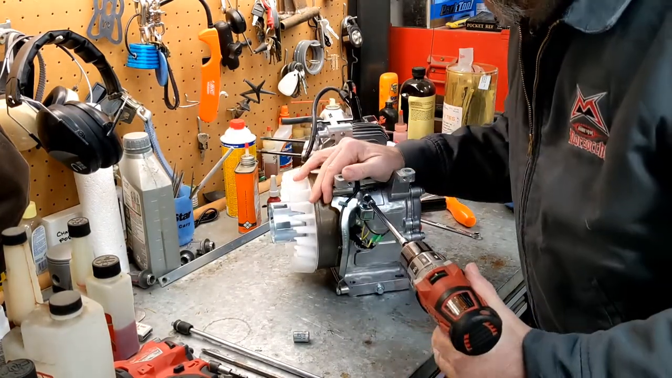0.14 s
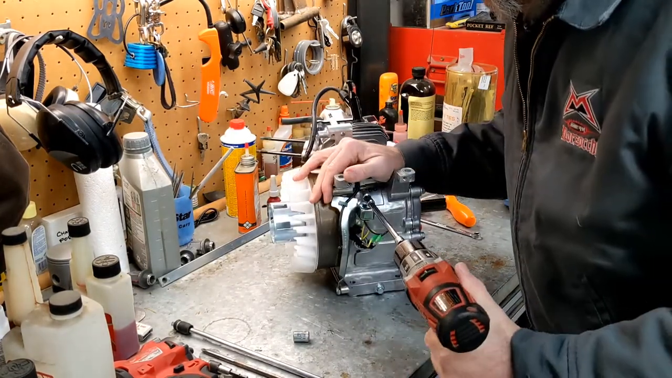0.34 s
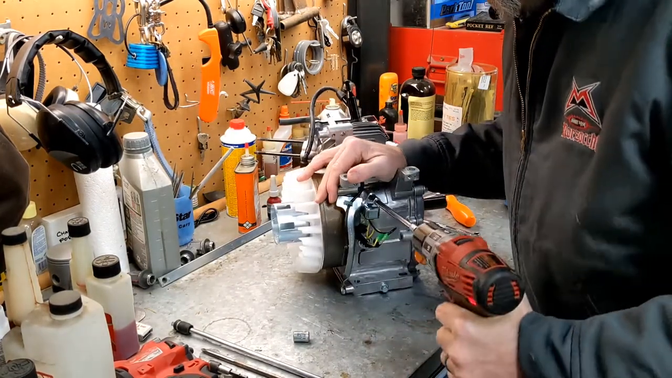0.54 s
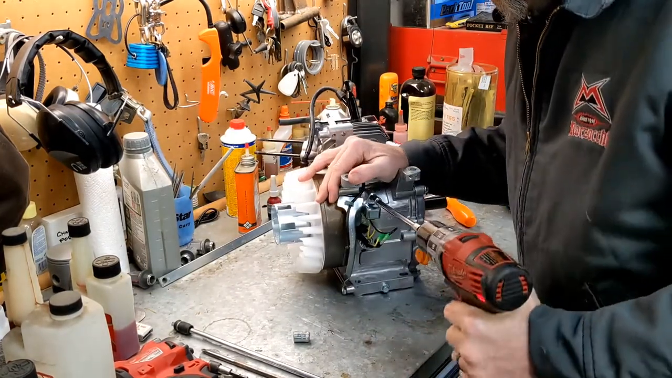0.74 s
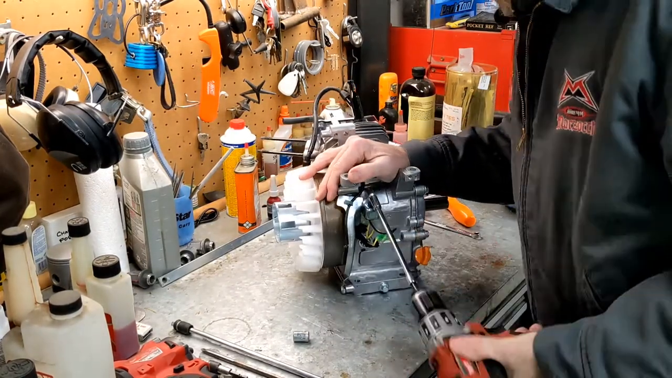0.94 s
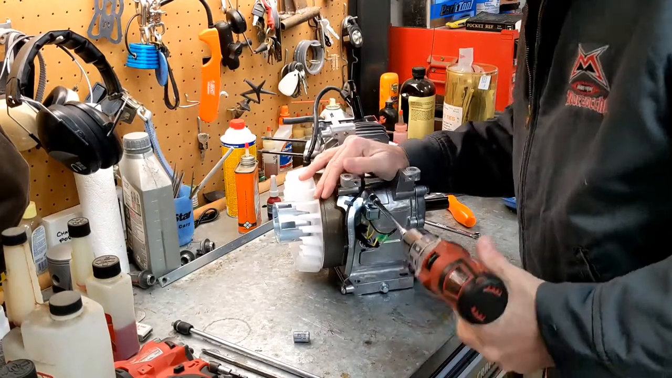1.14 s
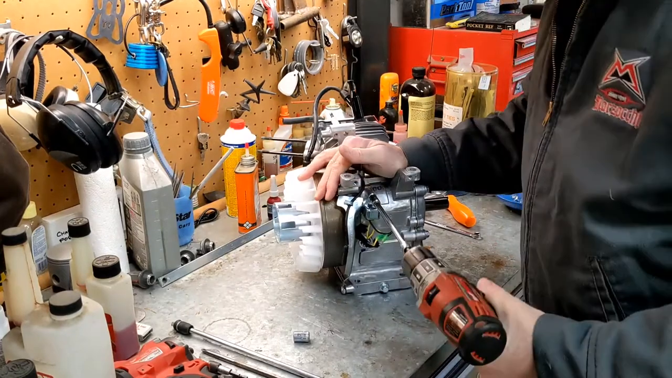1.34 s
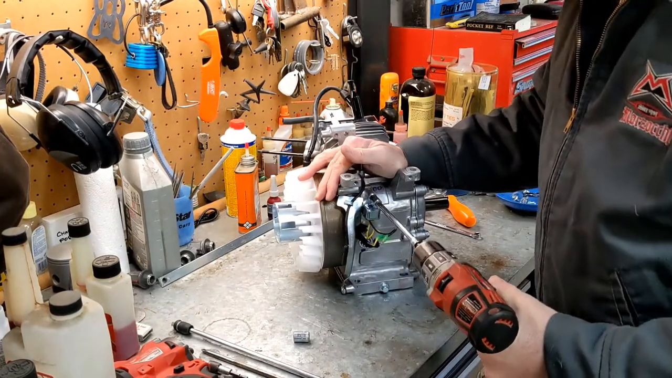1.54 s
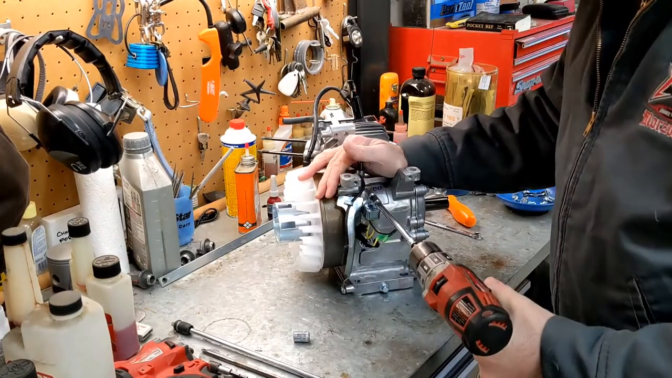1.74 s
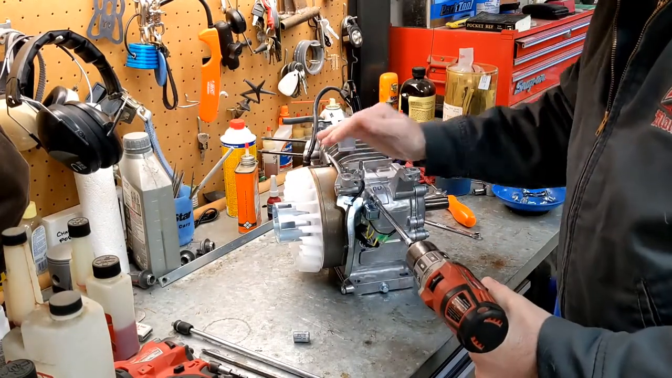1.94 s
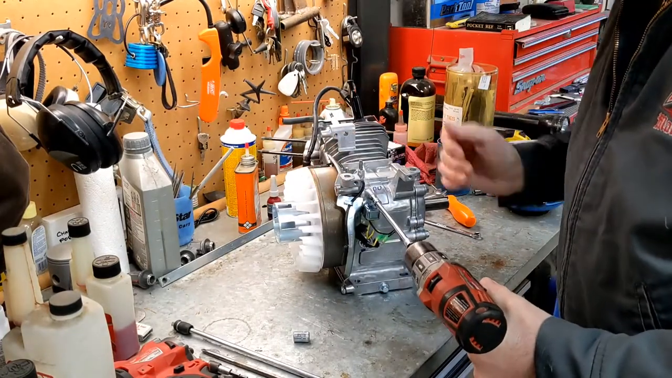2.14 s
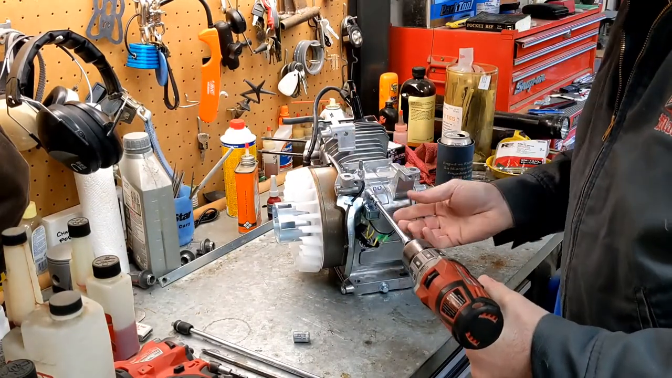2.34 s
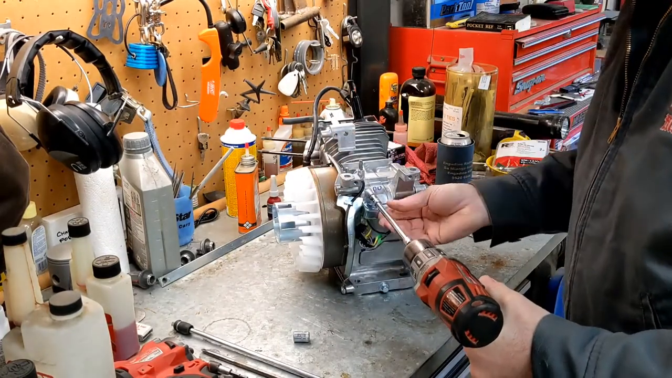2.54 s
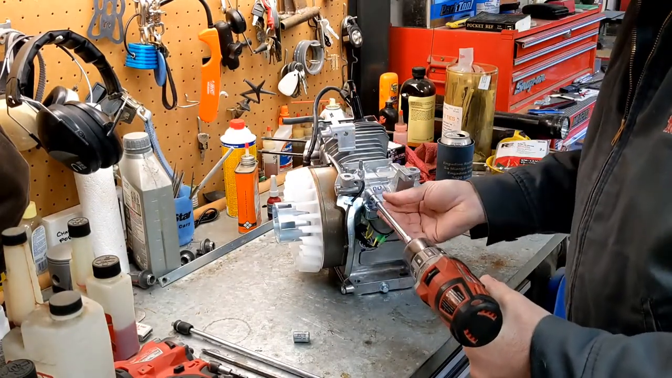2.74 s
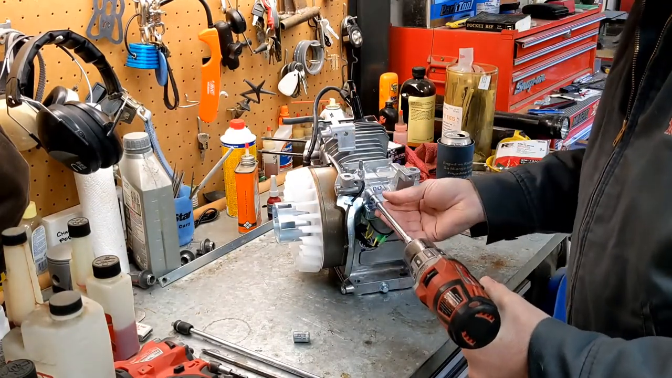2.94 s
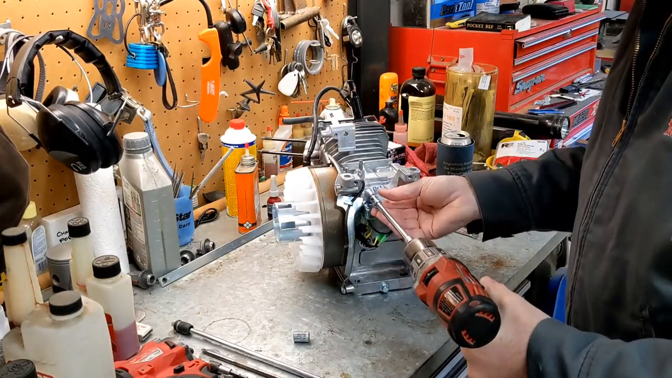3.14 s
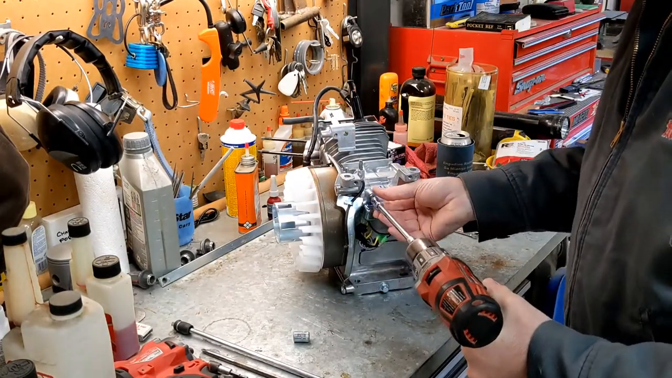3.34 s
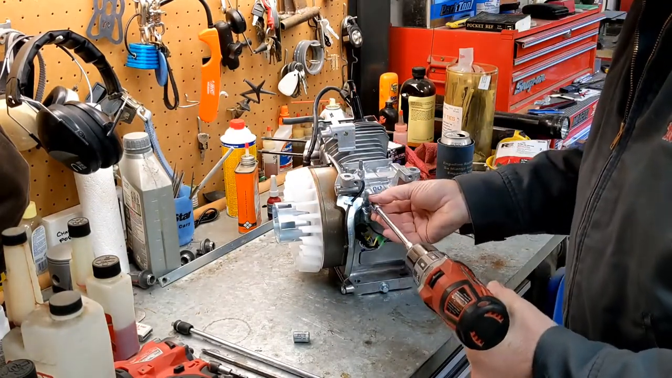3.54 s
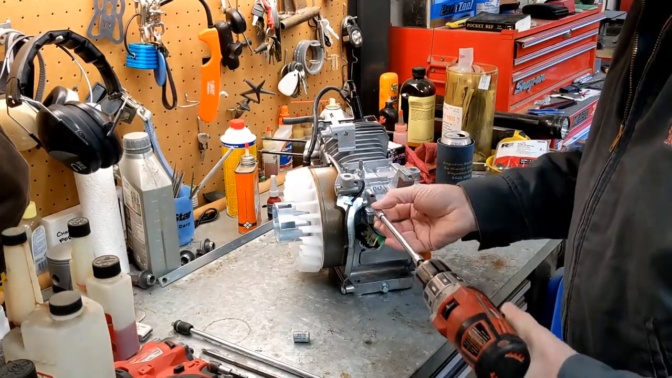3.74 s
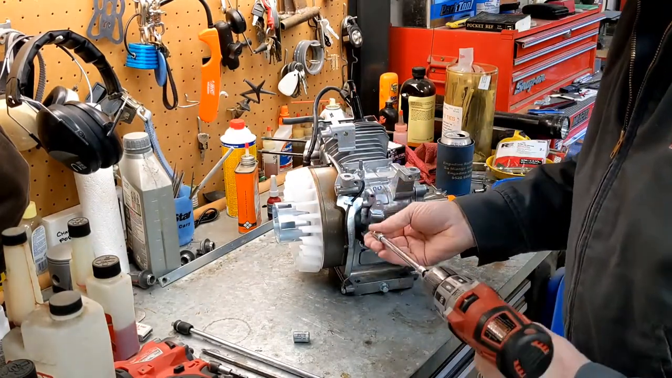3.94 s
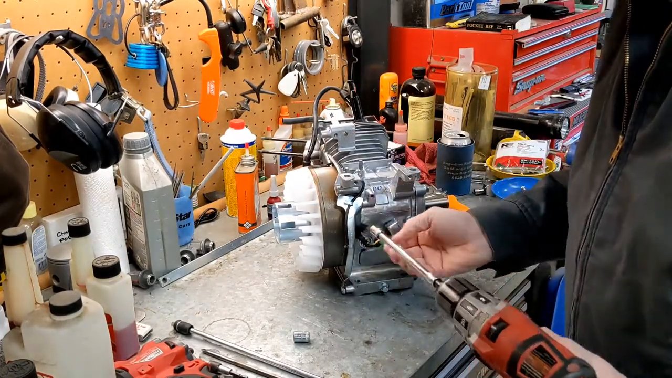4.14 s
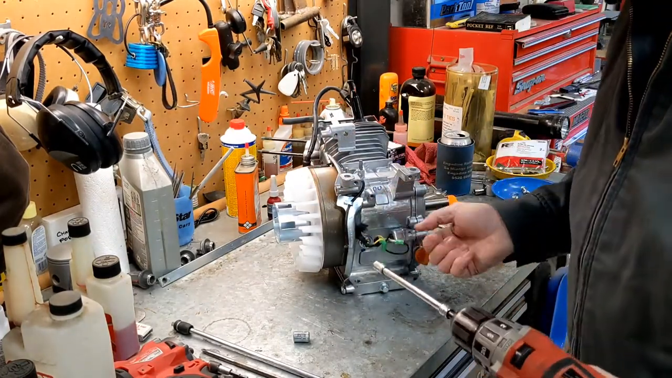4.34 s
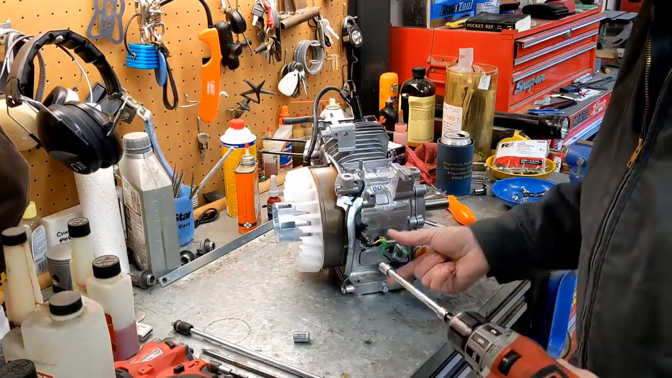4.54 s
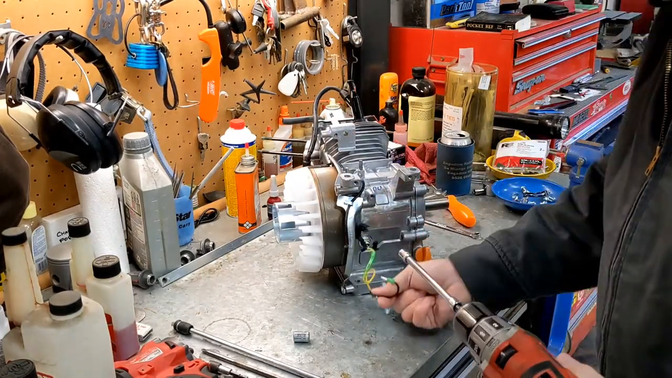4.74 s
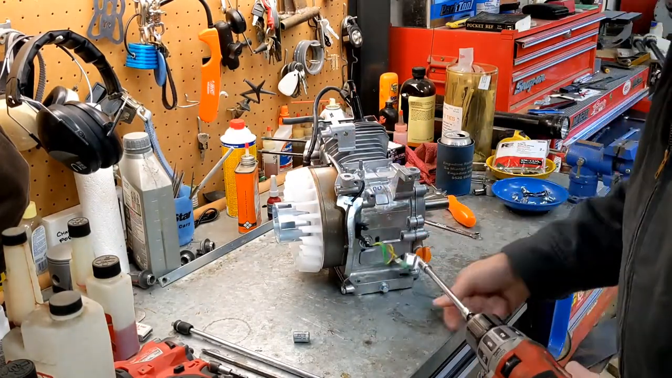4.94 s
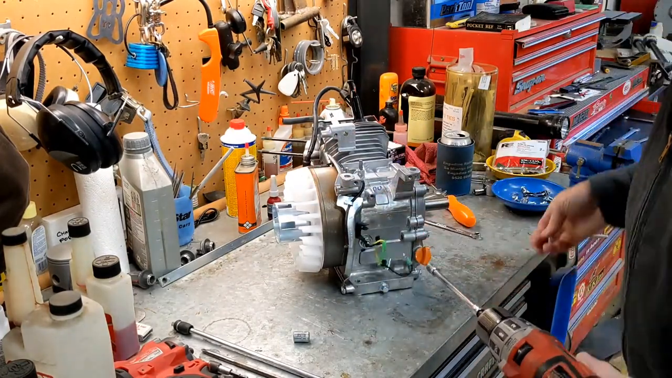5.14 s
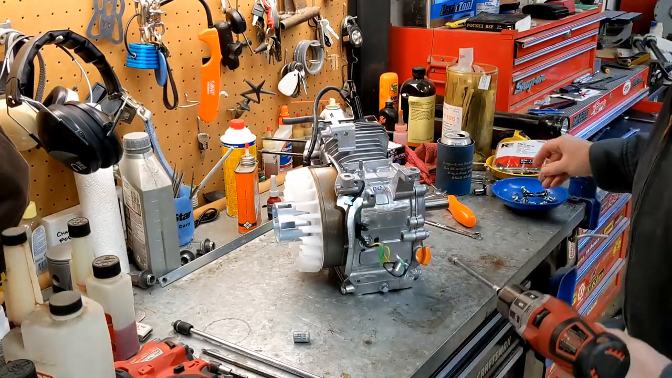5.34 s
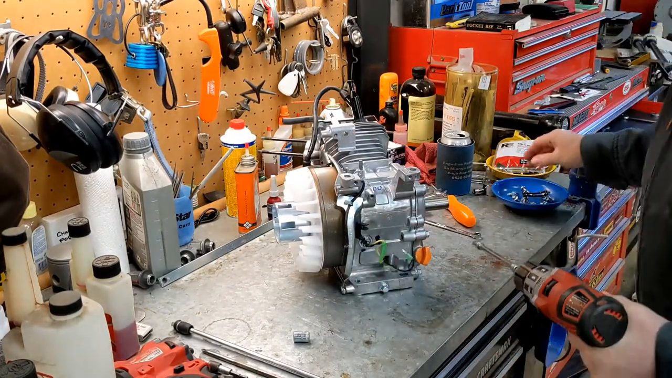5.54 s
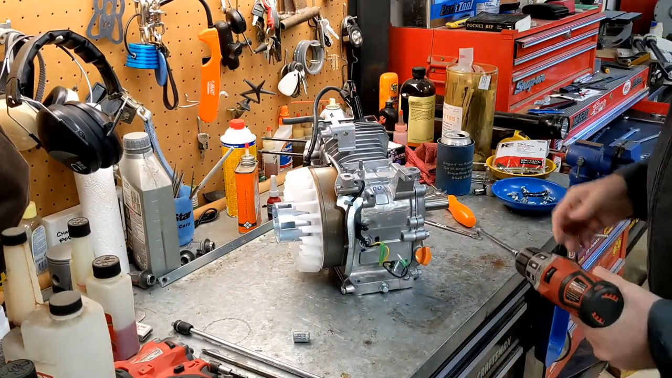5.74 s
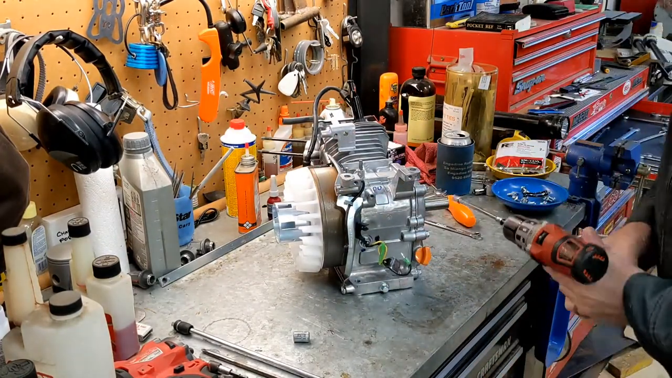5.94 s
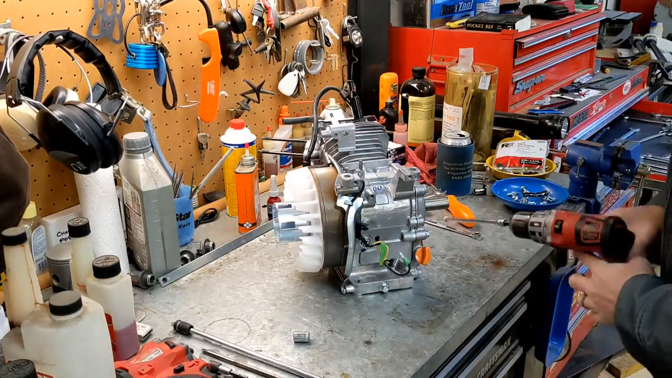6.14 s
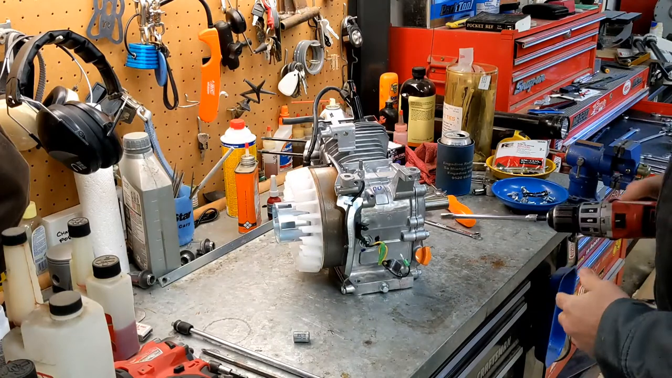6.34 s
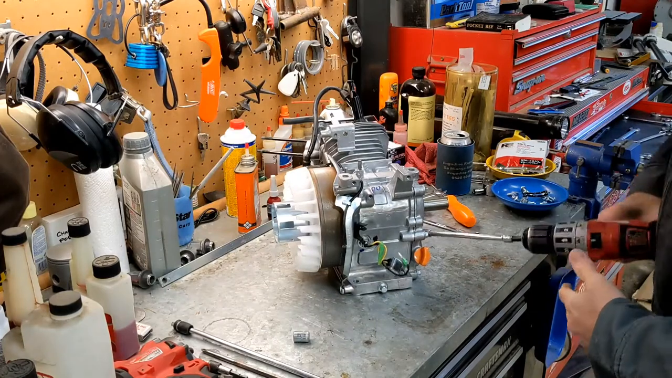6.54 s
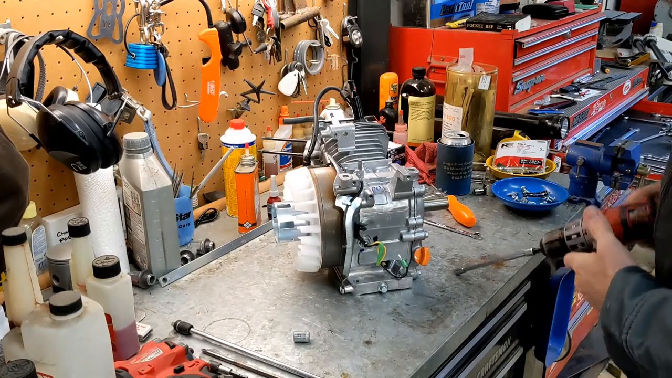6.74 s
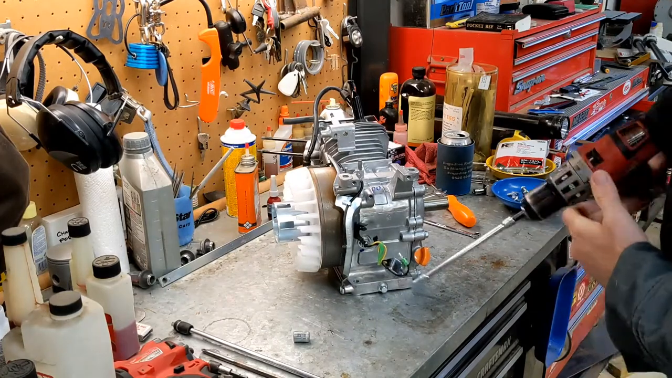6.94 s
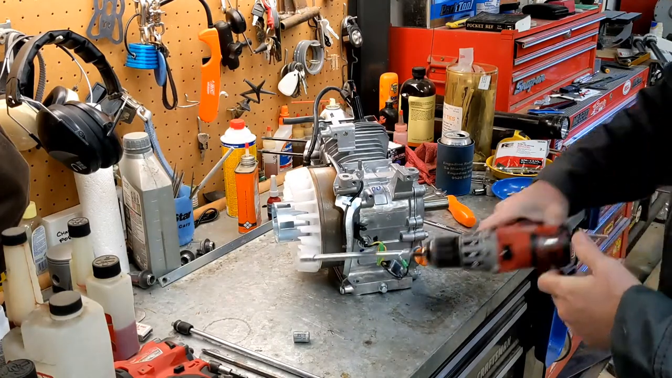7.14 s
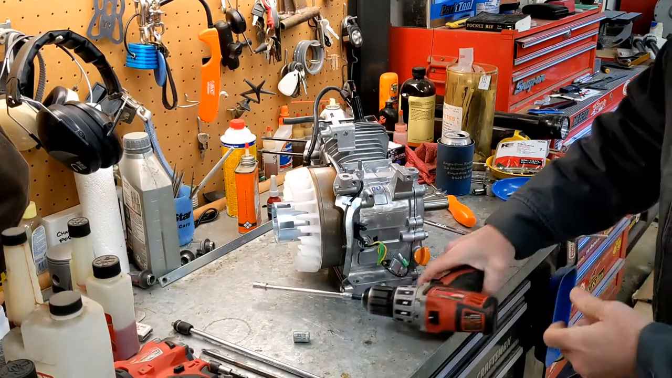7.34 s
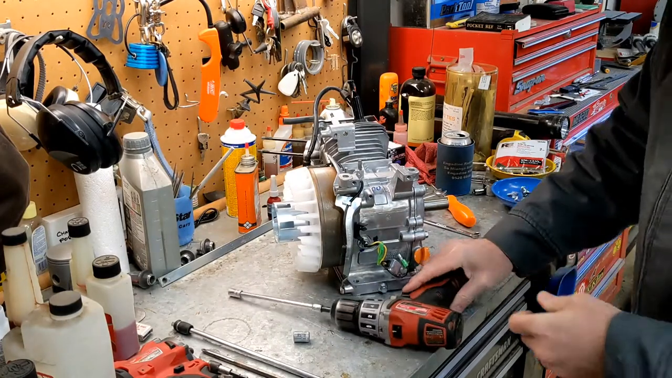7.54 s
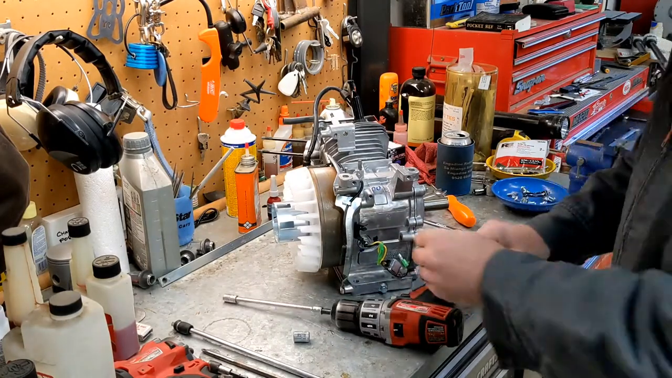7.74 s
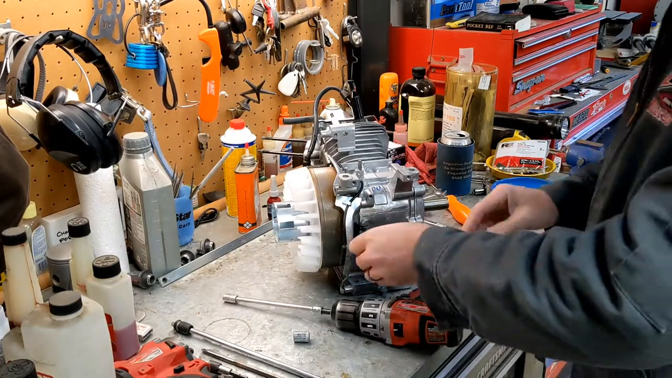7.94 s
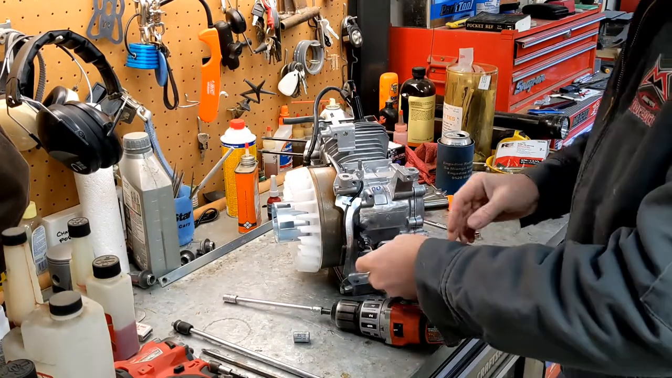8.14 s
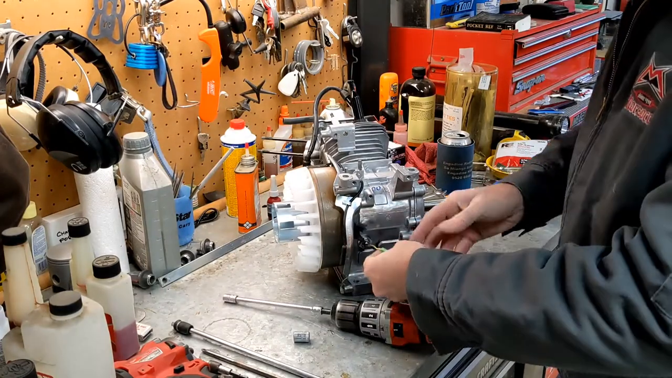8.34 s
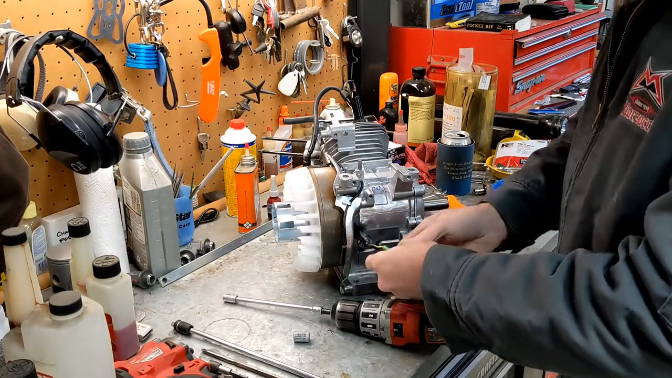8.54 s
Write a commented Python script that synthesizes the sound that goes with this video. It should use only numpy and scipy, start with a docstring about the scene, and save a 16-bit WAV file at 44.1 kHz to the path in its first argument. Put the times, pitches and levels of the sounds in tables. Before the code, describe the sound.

A cordless drill whirs for two seconds backing out a screw, stops abruptly, then metal ticks, a dish clink and bench knocks while vehicles drone outside.

```python
"""In a workshop, a cordless drill backs a screw out of a small engine on a steel bench, heard close up.
The drill is shaft and gear tones over chopped noise; three falling, rough rings mark its braking.
The bit ticks, the screw drops into a dish and the bench thuds: noise bursts with decaying modes.
Sleeves and hands rub as swelling hiss. Outside, two vehicle engines drone past as drifting sines,
their firing tones beating against each other, over filtered-noise road rumble and hiss."""
import sys
import numpy as np
from scipy import signal
from scipy.fft import rfft, irfft, next_fast_len
from scipy.io import wavfile
from scipy.ndimage import map_coordinates

SR = 44100
rng = np.random.default_rng(int(sys.argv[2]) if len(sys.argv) > 2 else 0)


def dump_mix(stems):
    """Bounce the given channels to the path in sys.argv[1] as a 16-bit WAV at rate SR."""
    frames = np.atleast_2d(stems).T  # one column per channel
    limited = np.clip(frames, -1, 1)  # hard clip at full scale
    pcm = np.round(limited * 32767).astype(np.int16)
    wavfile.write(sys.argv[1], SR, pcm)


N = 382788
T = np.arange(N) / SR  # time in seconds

# trigger pulled, let go, brake takes hold
TRIGGER_S, RELEASE_S, BITE_S = 1.465, 3.494, 3.522
SPIN_UP_S = 0.086  # time constant
STOP_DB_PER_S = 896  # fall of the drill sound


def amp(db):
    """Gain of a level in dB."""
    return 10 ** (np.asarray(db) / 20)


def unit(x):
    """x at rms 1."""
    return x / np.sqrt(np.mean(x ** 2) + 1e-20)


def along(points, hz):
    """(Hz, value) points interpolated on a log frequency axis."""
    f, v = np.transpose(points)
    return np.interp(np.log(hz + 1), np.log(f + 1), v)


def curves(rows):
    """One value per sample for each column after the time."""
    s, *cols = np.transpose(rows)
    return [np.interp(T, s, c) for c in cols]


def wobble(rate):
    """A random curve of straight segments, rate knots a second."""
    knots = rng.standard_normal(int(N * rate / SR) + 4)
    return map_coordinates(knots, [T * rate], order=1)


def filtered(x, response):
    """x times a complex response of frequency."""
    m = next_fast_len(x.shape[-1] + 8192)
    spectrum = rfft(x, m) * response(np.fft.rfftfreq(m, 1 / SR))
    return irfft(spectrum, m)[..., :x.shape[-1]]


def diffuse(pair):
    """Two unrelated signals mixed so that the bass is alike in both ports."""
    # Each row: frequency in Hz, left-right correlation of far sound.
    likeness = [(40, 0.76), (150, 0.89), (400, 0.63), (1000, 0.098), (3000, 0.054), (15000, 0.05)]

    def mid_side_gains(hz):
        turn = np.arccos(np.clip(along(likeness, hz), -1, 1)) / 2
        return np.array([np.cos(turn), np.sin(turn)])

    mid, side = filtered(pair, mid_side_gains)
    return np.array([mid + side, mid - side])


def rush(spectrum):
    """Diffuse stereo noise of rms 1."""
    noise = diffuse(rng.standard_normal((2, N)))
    return unit(filtered(noise, lambda hz: amp(along(spectrum, hz))))


def tone(hz, db, flutter_db, rate):
    """A sine of rms db whose strength drifts."""
    phase = 2 * np.pi * (np.cumsum(hz) / SR + rng.random())
    return np.sqrt(2) * amp(db + flutter_db * wobble(rate)) * np.sin(phase)


def quiver(t, spread_hz):
    """A random walk of phase that blurs a ring into a cluster of close modes."""
    return np.cumsum(rng.standard_normal(len(t))) * np.sqrt(2 * np.pi * spread_hz / SR)


def add(track, s, x):
    """Mixes x into track at time s."""
    part = track[round(s * SR):][:len(x)]
    part += x[:len(part)]


def engine(course, orders):
    """Eight firings per camshaft turn, weaker tones of uneven cylinders between, and a low hum."""
    hz, db, hum_db = curves(course)
    firing = tone(hz, db, flutter_db=0.5, rate=12)
    hum = tone(hz / 2, hum_db, flutter_db=1.0, rate=4)
    between = sum(tone(hz * k / 8, db + under_db, flutter_db=5.5, rate=7.4) for k, under_db in orders)
    return firing + hum + between


def street():
    """Engine tones outside over road rumble and hiss, with two dull swells and a faint steady hiss."""
    # Each row: time in seconds, firing frequency in Hz, firing level in dB,
    # level in dB of a separate low hum, at half the firing frequency.
    steady = [(0, 129, -53, -67.5), (2, 130, -44.5, -67), (2.75, 130.6, -43, -64), (3.5, 130, -44.5, -52),
              (4.3, 129.3, -39, -52), (5.2, 127.8, -37, -63), (6.1, 125, -45, -56), (6.7, 124.5, -40, -45),
              (7.2, 122.3, -34.5, -50), (7.9, 121.3, -40, -41), (8.68, 121, -35.5, -51.5)]
    revving = [(0, 110, -94.5, -64.5), (1.4, 109.7, -61.5, -67.5), (1.7, 119.4, -41.5, -62),
               (2, 130.1, -41, -80), (2.3, 140.6, -45, -72.5), (2.6, 134, -39.5, -64.5),
               (3.15, 124.3, -37, -68), (3.6, 116.7, -42, -61), (5.15, 116.1, -38, -62.5),
               (5.6, 112.6, -36.5, -63), (5.95, 112.7, -69.5, -55.5), (6.2, 109.2, -40.5, -67.5),
               (6.45, 104.2, -34, -61), (6.7, 103.4, -68, -58), (7.15, 108.5, -56.5, -49),
               (8.1, 99.5, -61.5, -49), (8.4, 100.7, -59, -48.5), (8.68, 111.6, -31, -40)]
    # Each row: multiple of camshaft speed, level in dB re the firing tone.
    steady_orders = [(5, -17), (6, -16), (7, -24.5), (9, -19), (10, -11.5), (11, -13), (13, -12.5),
                     (14, -23.5), (16, -11.5), (20, -26.5), (26, -22)]
    revving_orders = [(5, -25.5), (10, -18), (13, -14), (14, -16), (16, -17)]
    # Traffic. Each row: time in seconds, rumble level in dB, bright hiss level in dB.
    traffic = [(0, -53, -75), (2, -47, -55), (3.7, -44, -74), (5, -42, -70), (5.6, -34.5, -68.5),
               (5.8, -37.5, -59.5), (6.1, -41.5, -65), (6.7, -39.5, -59), (7.4, -38.5, -64),
               (8.2, -39, -64), (8.68, -34.5, -64.5)]
    # Rumble spectrum. Each row: frequency in Hz, relative density in dB per Hz.
    rumble = [(12, -50), (20, -24), (64, -21.5), (123, 3.5), (171, -7), (237, -6.5), (546, -26.5),
              (1000, -45.5), (1300, -69), (2200, -120)]
    # Dull swells: a long handling rub near by, then a short passing whoosh outside.
    # Each row: peak time in seconds, width in seconds, level in dB.
    swells = [(1.25, 0.59, -54), (5.6, 0.037, -52)]
    drone = engine(steady, steady_orders) + engine(revving, revving_orders)
    road_db, bright_db = curves(traffic)
    dull_gain = amp(road_db - 18.5)
    for s, width_s, db in swells:
        dull_gain += amp(db) * np.exp(-((T - s) / width_s) ** 2)
    hiss = dull_gain * rush([(300, -9.0), (600, 0.5), (1500, -10.0), (2000, -19), (4000, -51.5)])
    hiss += amp(bright_db) * rush([(900, -17.5), (1600, -2.5), (2700, -4.5),
                                   (3300, -11.5), (6000, -18), (9000, -42)])
    hiss += amp(-72.5) * rush([(1500, -22.0), (4000, -2.5), (9000, -3.0), (15000, -9.0)])
    road = amp(road_db + 1.2 * wobble(2.38)) * rush(rumble)
    return (drone + hiss + road) * amp([[.6], [-.6]])


def rubs():
    """Hands, sleeves and sliding tool: each stroke is a grainy hiss with body and treble layers."""
    # Each row: peak time in seconds, fall in seconds, body level in dB, treble level in dB.
    strokes = [(.04, 0.074, -61, -70.5), (.365, 0.0167, -58.5, -70.5), (.44, 0.045, -53, -66),
               (0.508, 0.06, -40, -49), (0.679, 0.036, -52, -66), (0.962, 0.079, -39.5, -45),
               (1.09, 0.0483, -44.5, -56), (1.23, 0.06, -55, -59.5), (1.35, 0.032, -49.5, -62),
               (1.44, 0.075, -52, -61.5), (3.6, 0.052, -54, -69.5), (4.23, .026, -59, -66),
               (4.29, 0.042, -59, -70), (4.5, 0.137, -68, -68), (4.63, 0.0176, -59.5, -66),
               (5.02, .025, -65, -63), (5.24, .074, -53, -58), (6.03, 0.111, -69, -68),
               (6.21, 0.076, -69, -64), (7.64, 0.032, -30.5, -46.5), (7.987, 0.0595, -42, -49.5)]
    rise_share = 0.49  # rise over fall
    body = rush([(300, -22.5), (1000, -1), (2800, 0.5), (6000, -11.5), (9000, -35.0)])
    fizz = rush([(3000, -30.0), (6000, 2.5), (11000, -5), (14500, -6.0)])
    power = np.zeros((2, N))
    for s, fall_s, *db in strokes:
        stroke = np.exp(-((T - s) / np.where(T < s, rise_share * fall_s, fall_s)) ** 2)
        power += amp(db)[:, None] ** 2 * stroke ** 2
    body_gain, fizz_gain = np.sqrt(power)
    grain = amp(1.5 * wobble(66))
    return grain * (body_gain * body + fizz_gain * fizz) * amp([[.8], [-.8]])


def ticks():
    """Each metal contact is a crack, a dying hiss and the ring of the bit, loudest near one mode."""
    # Each row: start in seconds, relative level in dB, low tilt in dB, treble tilt in dB,
    # loudest ring in Hz, ring level in dB re the contact.
    contacts = [(0.1323, -27, -9.5, -12, 2260, -22), (.427, -50.5, -5, -18, 2700, -13),
                (.6195, -42.5, 21, -16, 1880, -22.5), (0.8941, -13, -4.5, -12, 5900, -7),
                (0.9582, -25, -5, -17.5, 2940, -23.5), (1.03, -15.5, -7.5, -7, 5900, -11.5),
                (1.2087, -40.5, 4, -21, 2620, -15), (1.4627, -28, -11.5, -19.5, 2240, -19),
                (3.6665, -31.5, -37, -30, 5400, -2), (3.7203, -47, -26, -18, 4180, -18),
                (3.946, -49.5, -18, -18, 14600, -11), (4.0985, -51, -24, -32, 3600, -8),
                (4.215, -35, -28, -14, 14600, -10.5), (4.2485, -27, -34, -10.5, 6500, -3),
                (4.3321, -32, -8, -19, 3780, -15), (4.535, -59, -30, -10, 14600, 0),
                (4.568, -50.5, -18, -28, 3850, -10), (4.7157, -45.5, -17, -19, 7800, -8.5),
                (4.762, -51.5, -28, -17, 7900, -11), (4.7883, -49, -20, -20.5, 3850, -14.5),
                (4.853, -55, -28, -15.5, 5900, -8), (4.985, -53, -24, -13, 5900, -17),
                (5.1319, -8.5, -45.5, -25.5, 4200, -34.5), (5.8389, -49.5, 10.5, -42, 1920, 2),
                (6.53, -8, -23.5, -11, 2200, -12.5), (6.5923, -23.5, -4.5, -17.5, 1950, -10),
                (6.606, -28, -26, -13.5, 5900, -13), (6.682, -37, -4.5, -15, 1720, -5),
                (6.8431, -13, -11.5, -17, 2300, -18), (7.5639, -15, -10.5, -13, 5030, -30),
                (7.5701, -7.5, -5.5, -16.5, 2235, -16.5), (7.6241, -22, -17, -6.5, 2450, -27),
                (7.6413, -24.5, 4.5, -28.5, 1780, -27), (7.6879, -14.5, -4.5, -17.5, 1250, -7),
                (7.697, -23, -12.5, -11, 1250, -9), (7.706, -15, -15, -19.5, 2150, -14.5),
                (7.9446, -38, -7, -4.5, 1780, -10), (8.1511, -39.5, -7.5, -13, 3840, -10),
                (8.4256, -39.5, -19, -10, 3480, -20.5)]
    # Modes of the bit. Each row: frequency in Hz, t60 in seconds.
    bit = [(1250, 0.064), (1927, 0.18), (2300, 0.094), (3850, 0.065), (5911, 0.07), (7908, .07),
           (9400, 0.039), (14600, .06)]
    snap_t60_s, rattle_t60_s = 0.008, 0.041
    out, t = np.zeros(N), T[:SR // 3]
    for s, db, low_db, treble_db, ring_hz, ring_db in contacts:
        colour = [(250, low_db + 8.5), (1150, low_db + 13.5), (1900, -0.097), (5200, -2.5),
                  (8500, treble_db + 6.5), (12800, treble_db + 2.0), (14600, treble_db + 6)]
        snap = amp(-60 * t / snap_t60_s) * np.sign(rng.standard_normal(len(t)))
        rattle = 0.64 * amp(-60 * t / rattle_t60_s) * rng.standard_normal(len(t))
        crack = filtered(snap, lambda f: amp(along(colour, f)))
        # less bass in the longer rattle: the low part is gone sooner
        crack += filtered(rattle, lambda f: amp(along(colour, f)) * f / (f + 1500))
        ring = np.zeros(len(t))
        for hz, t60_s in bit:
            mode_db = rng.normal(0, .8) - 41 * abs(np.log2(hz / ring_hz))
            phase = 2 * np.pi * hz * t + quiver(t, spread_hz=110 + hz / 45)
            ring += amp(mode_db - 60 * t / t60_s) * np.sin(phase)
        add(out, s, amp(db + 3.0) * crack + amp(db + ring_db) * ring)
    return out


def thuds():
    """A soft push excites the low bench modes and shakes loose parts; longer contact is duller."""
    # Each row: start in seconds, relative level in dB, contact in seconds.
    blows = [(.616, -16.5, 0.0018), (0.898, -33.5, 0.0042), (.95, -21.5, 0.0055), (1.004, -14, 0.00099),
             (1.015, -10, .002), (6.843, -31, 0.0016), (7.565, -17.5, .002), (7.576, -6.5, .0024),
             (7.688, -25.5, .002)]
    # Each row: frequency in Hz, relative level in dB, t60 of the unloaded bench in seconds.
    bench = [(67, -10, .12), (126, 0.5, 0.22), (148.6, 5, 0.11), (211.6, -2, 0.17), (254.6, -4, 0.108),
             (328.5, -2.5, 0.11), (430, -8.5, 0.079), (554, -5, 0.03), (680, -6.5, 0.095), (907, -5, 0.03)]
    damped_share = 0.77  # share of the free t60 that the loaded bench keeps
    loose_parts = [(150, -22), (500, 1.5), (1300, -5.0), (3000, -13), (6000, -39)]
    out, t = np.zeros(N), T[:SR // 2]
    for s, db, contact_s in blows:
        ring = np.zeros(len(t))
        for k, (hz, mode_db, t60_s) in enumerate(bench):
            fade_db = mode_db + rng.normal(0, 1.2) - 60 * t / (t60_s * damped_share)
            # neighbouring modes start in opposite directions
            ring += (-1) ** k * amp(fade_db) * np.sin(2 * np.pi * hz * t)
        burst = amp(8 - 60 * t / 0.18) * rng.standard_normal(len(t))
        clatter = filtered(burst, lambda f: amp(along(loose_parts, f)))
        push = filtered(ring + clatter, lambda f: 1 / (1 + 1j * f * contact_s))
        add(out, s, amp(db - 6.0) * push)
    return out


def motor():
    """Shaft speed and gear noise level from trigger, load and brake."""
    start_hz, full_hz = 142.6, 299  # speed when first heard, free speed
    load_hz, ease_s = 14.5, 0.65  # speed held back by the tight screw, time constant of its easing
    brake_hz_per_s = 2200
    running_s = np.clip(T - TRIGGER_S, 0, None)
    hz = full_hz - load_hz * np.exp(-running_s / ease_s)
    hz -= (full_hz - load_hz - start_hz) * np.exp(-running_s / SPIN_UP_S)
    whirr_db = -35 + 8 * np.log2(hz / full_hz)  # 8 dB per octave of speed
    whirr_db -= STOP_DB_PER_S * np.clip(T - BITE_S, 0, 1)
    return np.clip(hz - brake_hz_per_s * np.clip(T - RELEASE_S, 0, 1), 0, None), whirr_db


def drill():
    """Shaft orders ride on gear noise that is chopped once a turn: returns noise and tones."""
    # Tones of armature and brushes. Each row: multiple of shaft speed, relative level in dB.
    shaft = [(2, -5), (4, -3), (5, -9), (6, -11), (9, -2), (14, -7), (15, 1), (18, -4), (20, -12), (24, -5),
             (26, -8), (27, -5), (30, -11), (31, -9), (33, -3), (35, -10), (36, -3), (37, -9), (38, -7),
             (39, -5), (40, -7), (41, -10), (42, -6), (44, -8), (48, -10)]
    # Gear mesh. Each row: multiple of shaft speed, relative level in dB.
    gears = [(8.21, -10), (10.21, -6)]
    # Gear and fan noise. Each row: frequency in Hz, relative density in dB per Hz.
    whirr = [(150, -16), (250, -10.5), (452, -17), (586, -13), (802, -13), (875, -8.5), (971, -13.5),
             (1180, -3.5), (1640, -4.5), (2620, -5.5), (3910, -7.5), (10900, -8.5), (16000, -15.5)]
    # Resonances. Each row: multiple of shaft speed, centre in Hz, width in Hz, level in dB re gear noise.
    housing = [(3, 662, 43, 5), (9, 1570, 91, 1.5)]
    tight_db, loose_s, loosen_s = 4.5, 2.9, 0.8  # gain while tight, time it is loose, time to loosen
    hz, whirr_db = motor()
    hz = hz * (1 + 0.000914 * wobble(25))
    on = np.clip((T - TRIGGER_S) / 0.006, 0, 1) * (hz > 0)
    chop = 1 + 0.12 * np.cos(2 * np.pi * np.cumsum(hz) / SR)
    noise = unit(chop * filtered(rng.standard_normal(N), lambda f: amp(along(whirr, f))))
    # tones are held down early in the spin-up and die when the trigger is let go
    settled_db = whirr_db - 100 * np.exp(-np.abs(T - TRIGGER_S) / SPIN_UP_S)
    settled_db -= STOP_DB_PER_S * np.clip(T - RELEASE_S, 0, 1)
    load = np.clip((loose_s - T) / loosen_s, 0, 1)
    lines = np.zeros(N)
    for k, db in shaft + gears:
        line_db = settled_db + db - 9 + tight_db * load * (k > 14)
        lines += tone(k * hz, line_db, flutter_db=1.5 + k / 11, rate=4.986)
    # third order whine, growing 3.5 dB per second against the gear noise
    whine_db = whirr_db - 11 + 3.5 * (T - TRIGGER_S)
    lines += tone(3 * hz, whine_db, flutter_db=0.6, rate=4.02)
    for k, peak_hz, width_hz, db in housing:
        resonance = np.exp(-((k * hz - peak_hz) / width_hz) ** 2) * (T < RELEASE_S)
        lines += resonance * tone(k * hz, whirr_db + db, flutter_db=1.5, rate=30)
    return on * amp(whirr_db + 1.06) * noise, on * lines


def brake():
    """The sudden stop shakes the housing in three rough jolts, each lower than the last."""
    first_s, gap_s, t60_s = 3.504, 0.0115, 0.044
    out, t = np.zeros(N), T[:SR // 8]
    for k in range(3):
        hz = 766 - 55 * k
        db = -26.5 - 3.5 * k
        ring = np.sin(2 * np.pi * hz * t + quiver(t, spread_hz=46))
        add(out, first_s + gap_s * k, amp(db - 60 * t / t60_s) * ring)
    return out


def dish():
    """The screw lands, bounces and rattles as noise; the dish rings in blurred modes."""
    # Each row: start in seconds, relative level in dB, treble boost in dB.
    drops = [(5.609, -5.5, -7), (5.6463, -15.5, 8), (5.652, -15, 7.5)]
    # Each row: frequency in Hz, relative level in dB, t60 in seconds.
    modes = [(2430, -1, 0.13), (7350, -14.5, 0.221), (7623, -23, 0.18), (8333, -24, 0.081),
             (9000, -15.5, 0.09), (9862, -9.5, 0.14), (11160, -4, 0.1)]
    out, t = np.zeros(N), T[:SR // 2]
    for s, db, treble_db in drops:
        ring = np.zeros(len(t))
        for hz, mode_db, t60_s in modes:
            fade_db = mode_db + treble_db * (hz > 5000) - 60 * t / t60_s
            phase = 2 * np.pi * hz * t + quiver(t, spread_hz=30 + hz ** 2 / 2e5)
            ring += amp(fade_db) * np.sin(phase)
        fade = amp(-60 * t / 0.016) + 0.26 * amp(-60 * t / 0.14)
        colour = [(300, -23.5), (800, -1.5), (2500, -1.5), (5000, 2.5),
                  (9000, treble_db), (15000, treble_db - 5)]
        rattle = filtered(fade * rng.standard_normal(len(t)), lambda f: amp(along(colour, f)))
        add(out, s, amp(db - 13) * ring + amp(db - 7.5) * rattle)
    return out


def heard(x, lag, pan_db, wet_db):
    """Direct sound, left lag samples after right, plus a fresh shop tail every quarter second."""
    # Reverberation. Each row: frequency in Hz, t60 in seconds.
    shop = [(200, 0.89), (1000, 0.3), (4000, 0.25), (12000, 0.18)]
    half_lag = np.array([[-1], [1]]) * lag / 2
    out = filtered(x, lambda f: np.exp(2j * np.pi * f * half_lag / SR)) * amp([[pan_db], [-pan_db]])
    size = SR // 4
    for start in size * np.unique(np.flatnonzero(x) // size):
        hz, t, z = signal.stft(rng.standard_normal((2, SR // 2)), SR, nperseg=256)
        decay = amp(-60 * t / along(shop, hz)[:, None])
        tail = diffuse(signal.istft(z * decay, SR, nperseg=256)[1])
        tail /= np.linalg.norm(tail[0])
        echo = signal.fftconvolve(x[None, start:start + size], tail, axes=1)
        add(out.T, start / SR + .003, amp(wet_db) * echo.T)
    return out


def scene():
    """Near sources in the shop over the street outside."""
    whirr, whine = drill()
    near = heard(ticks(), lag=0.99, pan_db=2.5, wet_db=-2)
    near += heard(thuds(), lag=3.3, pan_db=.8, wet_db=-15)
    near += heard(whirr + brake(), lag=2.62, pan_db=1.64, wet_db=0.5)
    near += heard(whine, lag=1.2, pan_db=1.1, wet_db=-15)
    near += heard(dish(), lag=5.1, pan_db=3.0, wet_db=-3.5)
    return near + rubs() + street()


def record(dry):
    """The microphone rolls off at both ends of the band; nothing passes above the band limit."""
    # Each row: frequency in Hz, response in dB.
    edge = [(25, -12), (45, 0.5), (60, -0.5), (14500, 1), (15400, -0.5), (15800, -19.5), (16500, -33.5)]
    top_hz = 16700
    margin = 2 ** 11
    padded = np.pad(dry, [(0, 0), (margin, margin)], mode="reflect", reflect_type="odd")
    return filtered(padded, lambda hz: amp(along(edge, hz)) * (hz < top_hz))[:, margin:-margin]


dry = scene()
out = record(dry)
dump_mix(out)
```